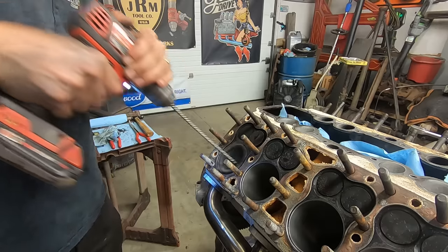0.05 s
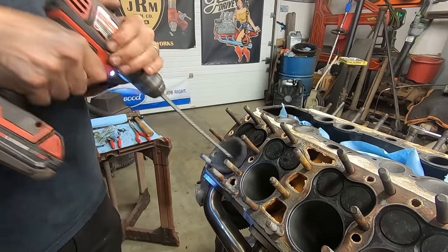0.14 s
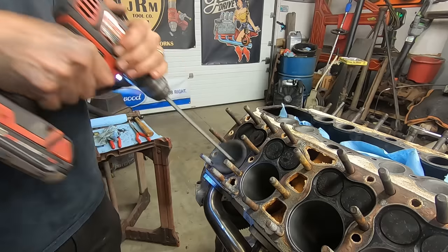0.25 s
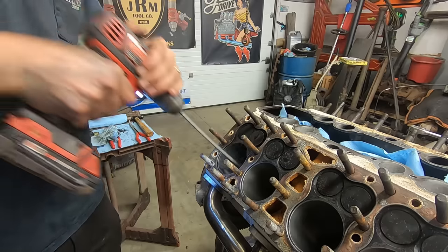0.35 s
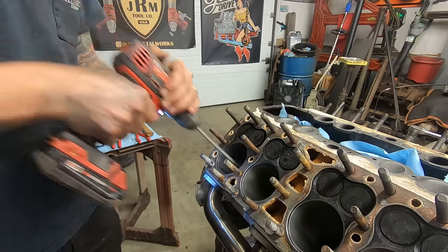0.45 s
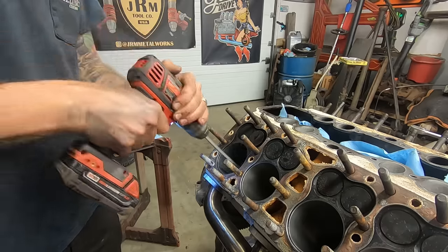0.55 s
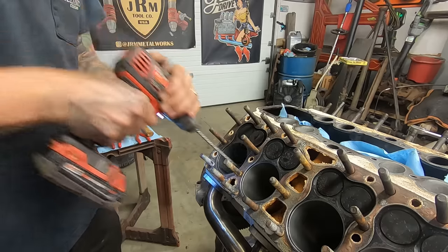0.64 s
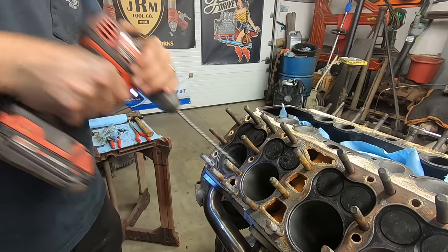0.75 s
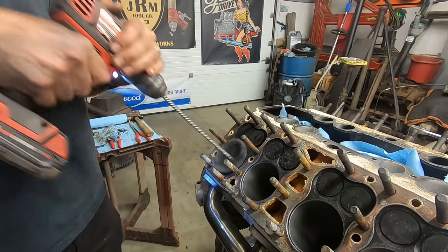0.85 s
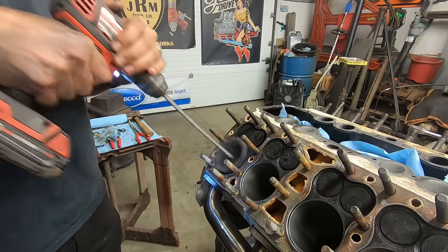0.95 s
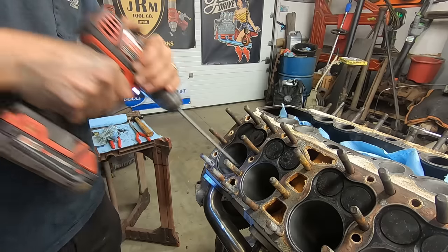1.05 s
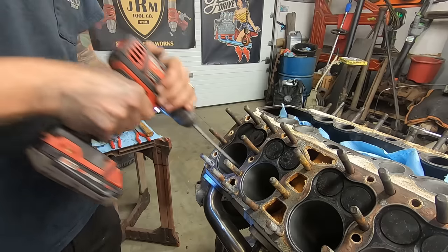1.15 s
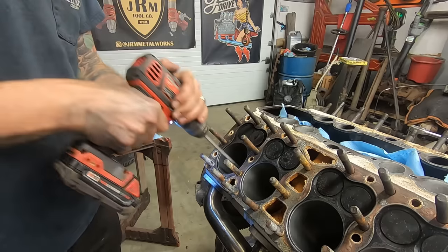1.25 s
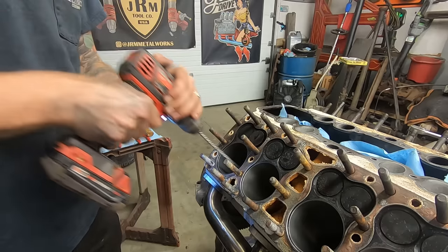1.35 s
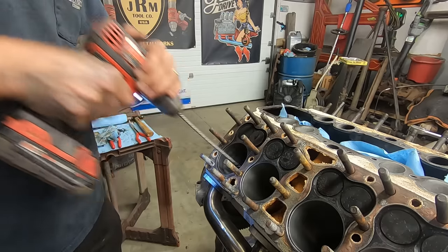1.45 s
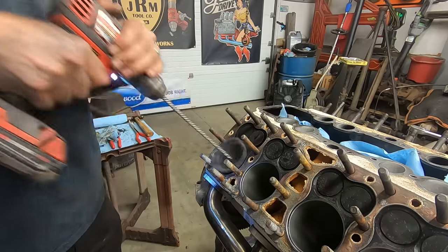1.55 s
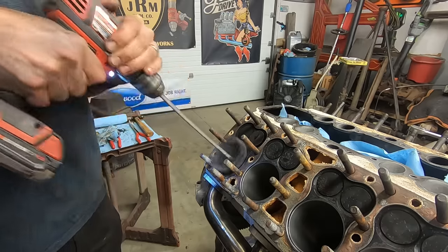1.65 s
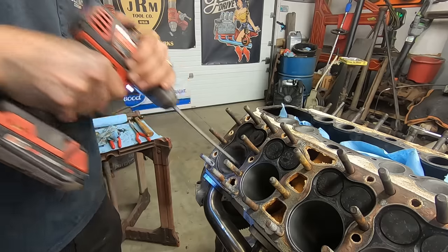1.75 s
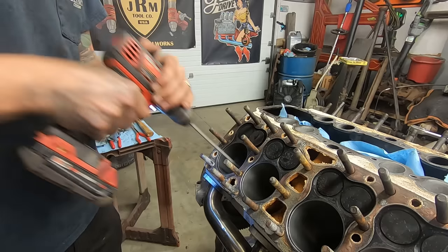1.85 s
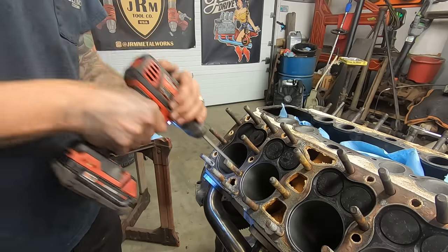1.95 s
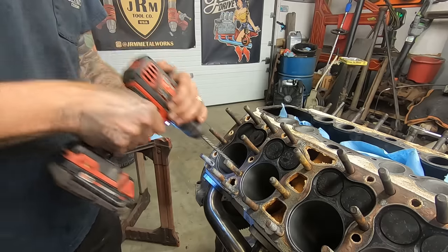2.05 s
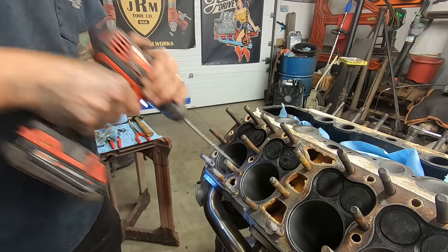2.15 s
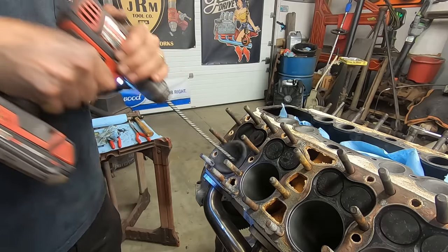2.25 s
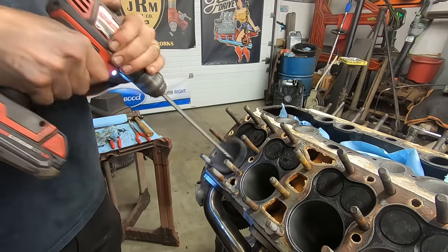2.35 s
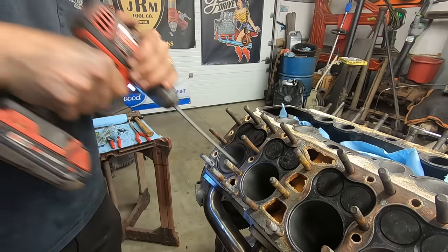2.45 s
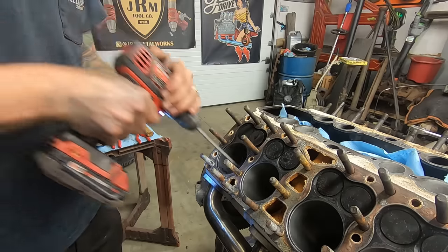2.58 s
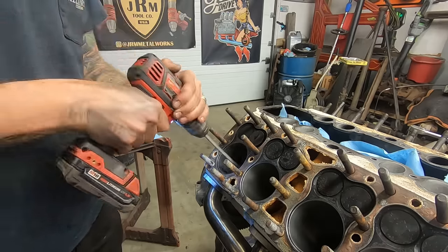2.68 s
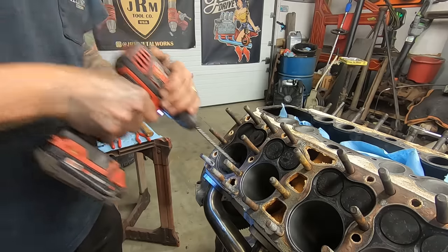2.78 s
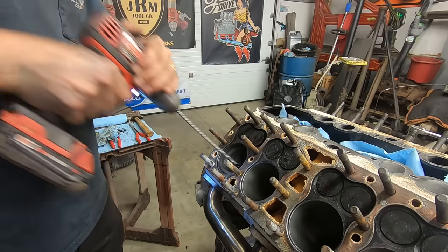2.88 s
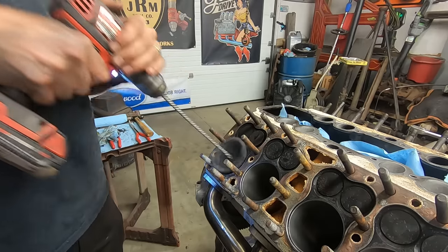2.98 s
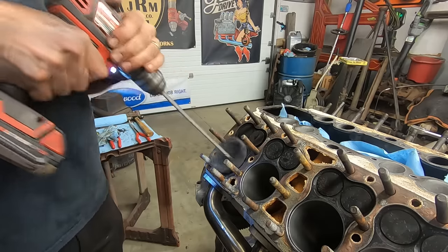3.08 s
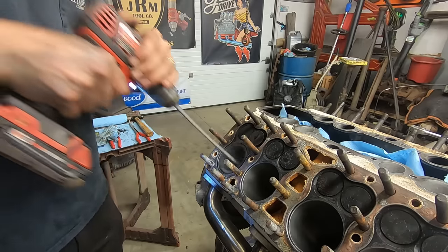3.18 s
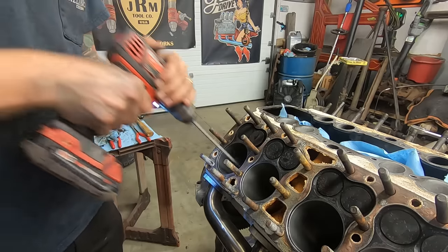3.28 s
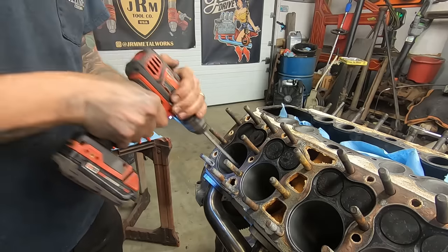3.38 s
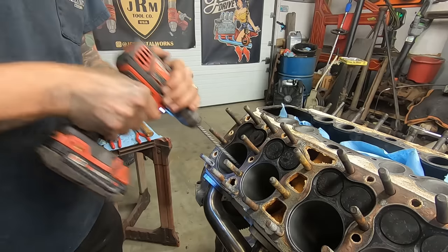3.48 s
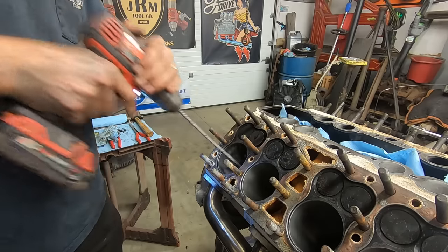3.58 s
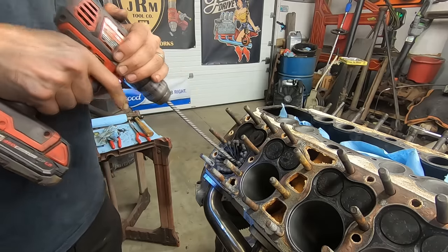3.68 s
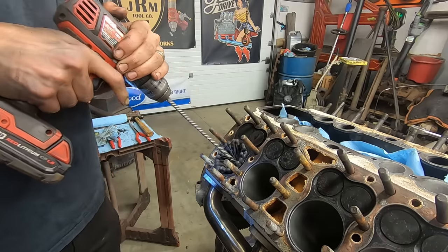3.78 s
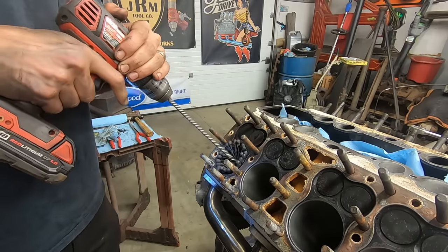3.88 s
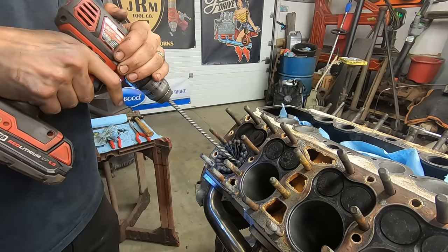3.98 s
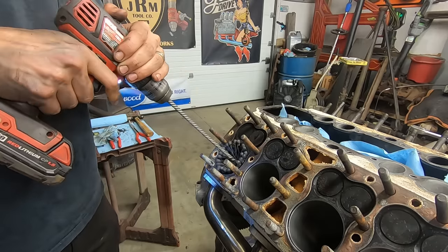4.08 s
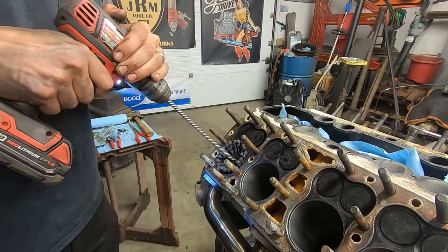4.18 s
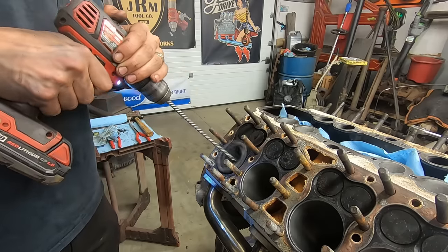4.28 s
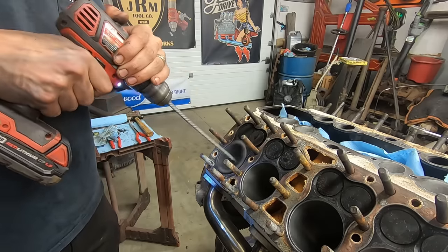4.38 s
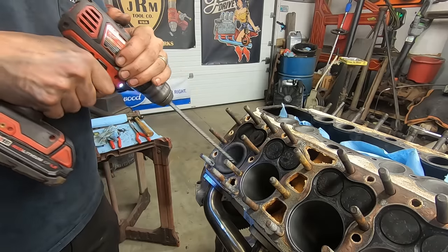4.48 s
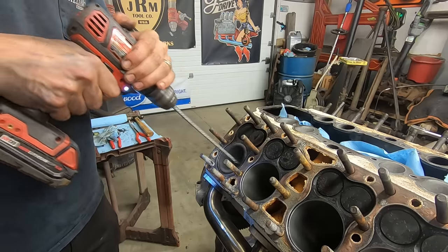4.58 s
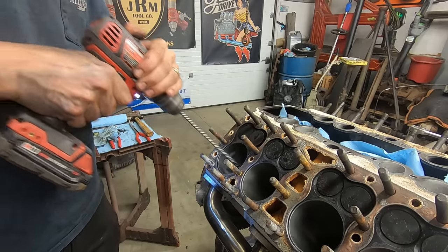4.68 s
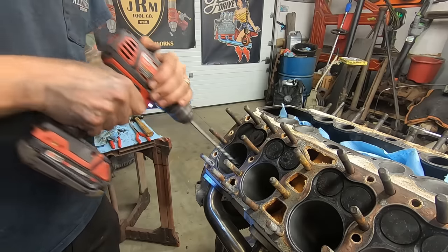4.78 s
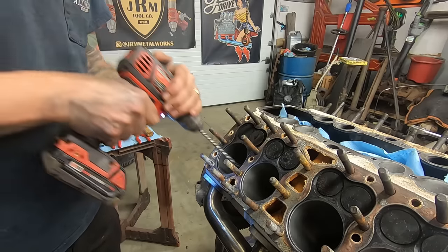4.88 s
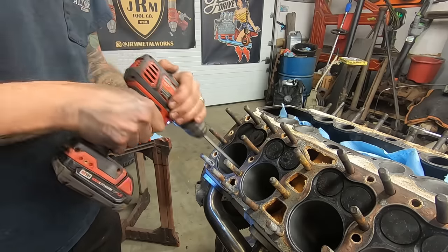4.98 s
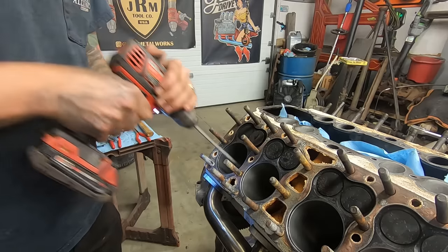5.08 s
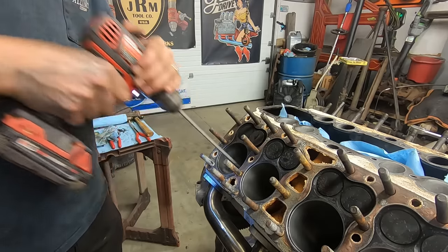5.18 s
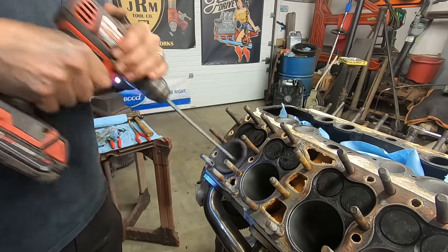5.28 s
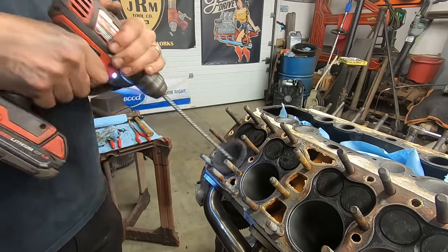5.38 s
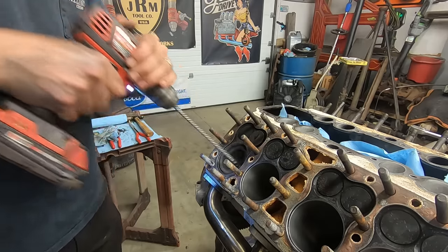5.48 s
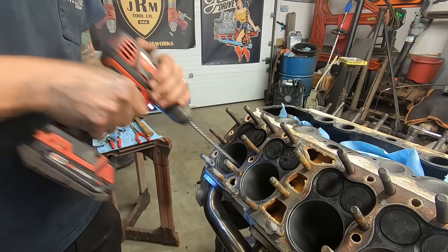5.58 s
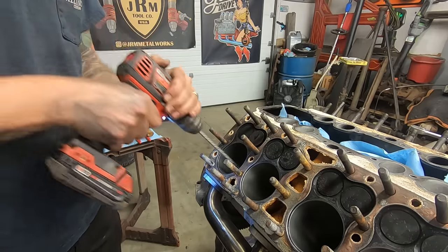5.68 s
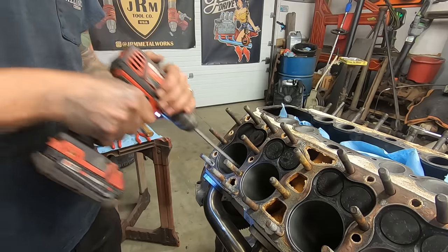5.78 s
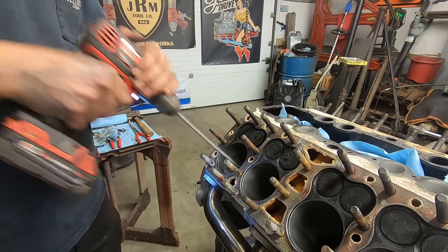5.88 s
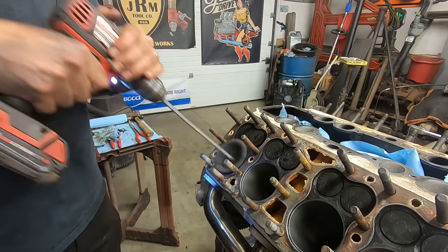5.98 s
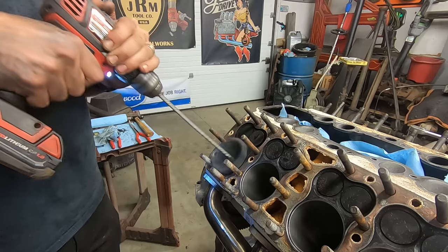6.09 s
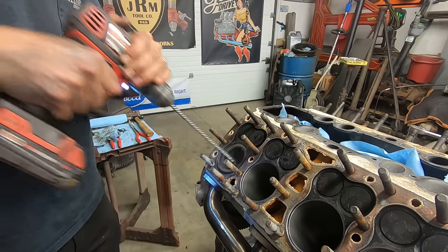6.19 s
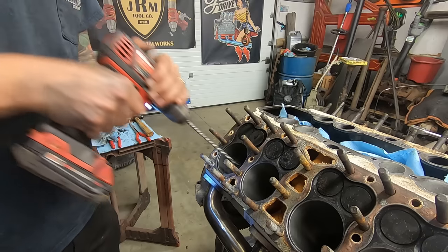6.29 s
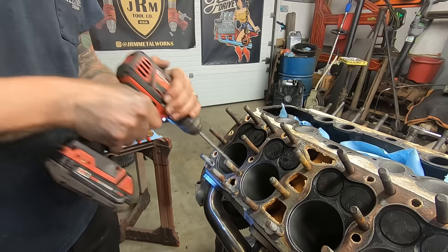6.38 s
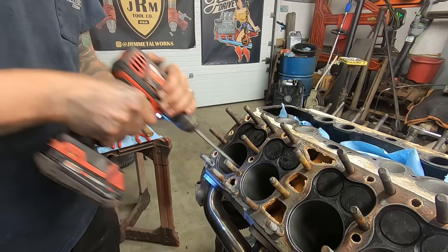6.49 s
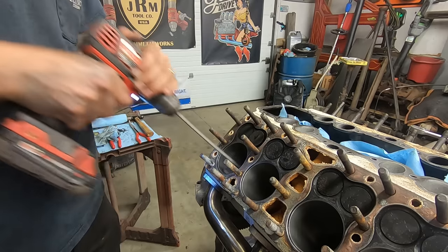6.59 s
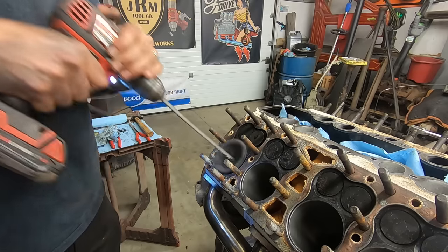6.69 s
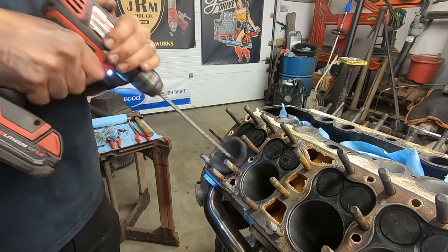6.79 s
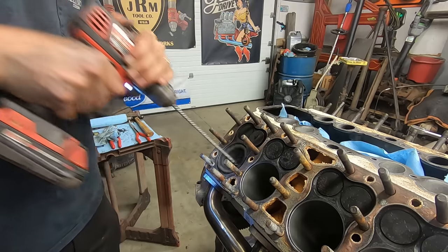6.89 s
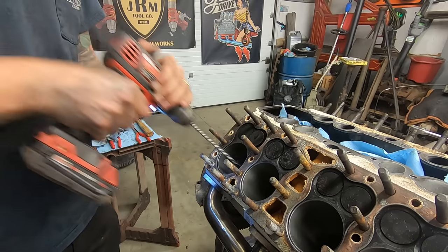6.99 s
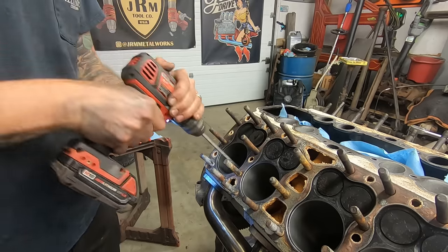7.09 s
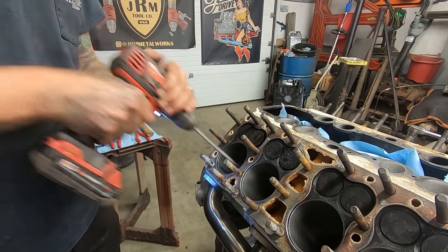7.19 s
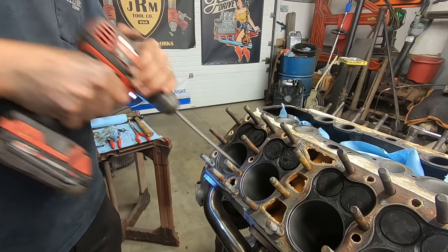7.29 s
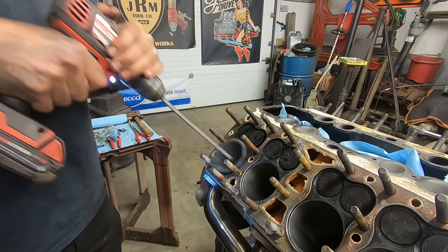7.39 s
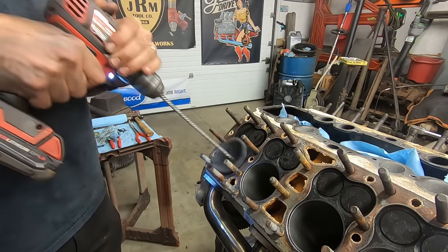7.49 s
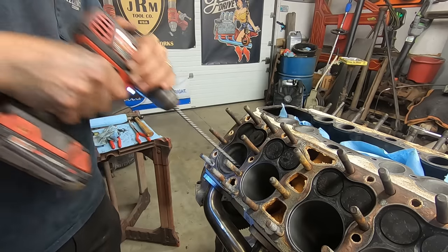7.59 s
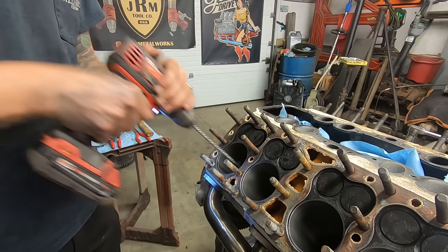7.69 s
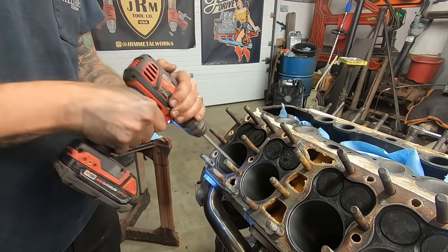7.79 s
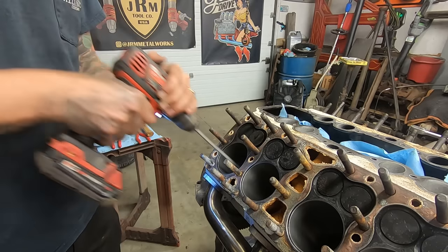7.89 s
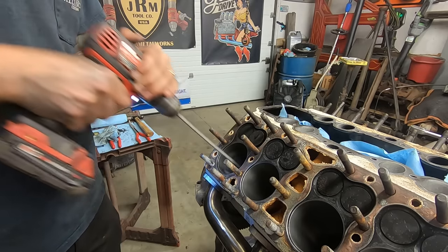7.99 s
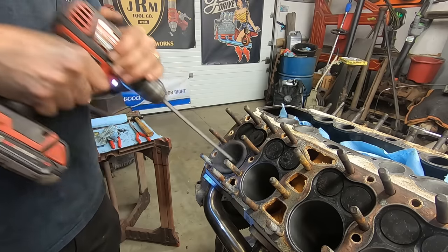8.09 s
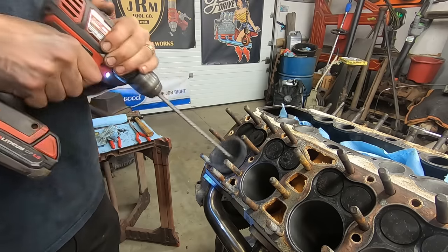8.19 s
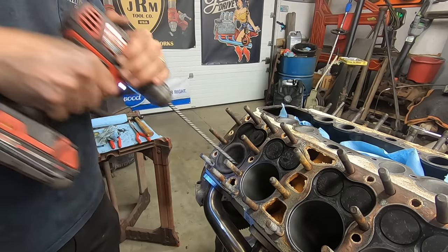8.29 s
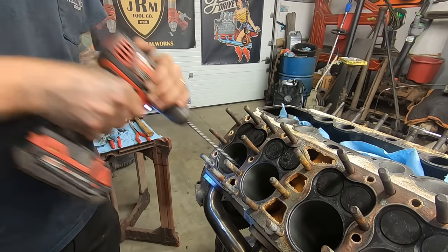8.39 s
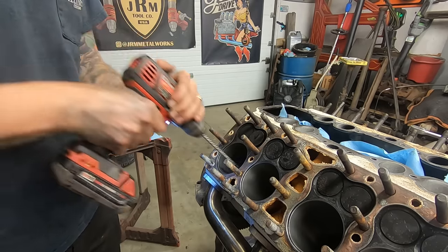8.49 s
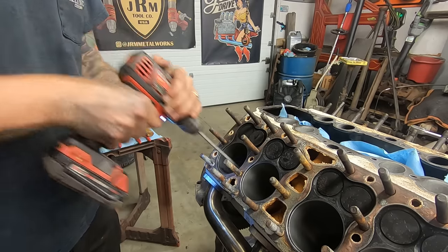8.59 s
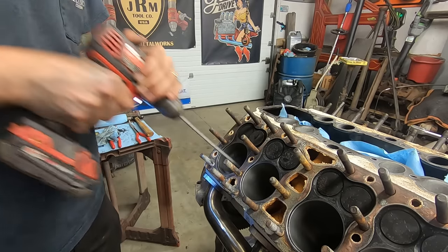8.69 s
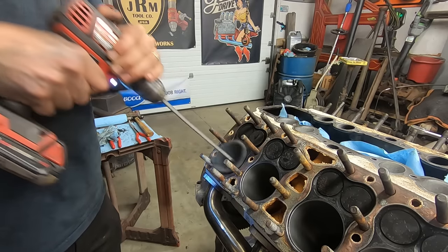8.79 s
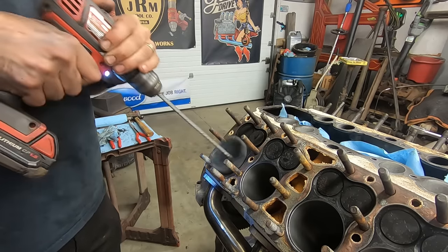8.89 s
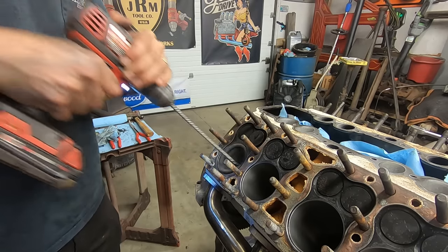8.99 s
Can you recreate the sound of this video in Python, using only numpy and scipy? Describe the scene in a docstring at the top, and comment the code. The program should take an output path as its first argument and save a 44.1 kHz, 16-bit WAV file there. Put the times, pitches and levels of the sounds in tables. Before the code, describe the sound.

Gritty, rhythmic scraping inside an iron engine cylinder under a steady geared drill whine, broken by a brief coast-down, switch clicks and a jolting restart.

```python
"""A cordless drill spins a ball hone up and down a cylinder of an iron engine block in a garage.
The gears whine and rattle as sine tones and dense tiny knocks; the balls scrape as coloured impacts and squeal.
The speed sags with every stroke; then the drill coasts to a stop and the balls ring their wire springs.
The trigger and the direction switch click, built from short knocks and rings.
It starts again the other way round: the gears strain, the hone jolts, and the strokes go on."""
import sys
import numpy as np
from scipy import signal
from scipy.fft import rfft, irfft
from scipy.io import wavfile

SR = 44100
rng = np.random.default_rng(int(sys.argv[2]) if len(sys.argv) > 2 else 0)


def materialize(psi):
    """Save the field psi as 16-bit PCM at rate SR to the path in sys.argv[1].

    A 1-D psi becomes a single channel; in a 2-D psi each row is a channel.
    """
    bounded = np.clip(np.atleast_2d(psi).T, -1, 1)
    quanta = np.round(bounded * 32767).astype(np.int16)
    wavfile.write(sys.argv[1], SR, quanta)


N = 399105
TIME, FREQ = np.arange(N) / SR, np.arange(N // 2 + 1) * SR / N  # seconds, Hz
RELEASE_S, REVERSE_S, RESTART_S = 3.63, 4.134, 4.36  # trigger let go, direction changed, motor on again
GEAR_RATIO = 8  # motor turns for one turn of the chuck and hone

# where each stroke turns round deep in the bore: (time [s], motor speed [turns/s], extra rubbing [dB])
BOTTOMS = [(0.0, 241.3, 6.5), (0.70, 240.7, 6), (1.413, 240.7, 6), (2.14, 239.1, 6.5), (2.86, 240.8, 6),
           (3.538, 240.6, 5), (5.14, 235.3, 6), (5.90, 234.5, 2.5), (6.6, 234.2, 2.5), (7.3, 234.4, 2),
           (7.98, 234.6, 3.5), (8.68, 234, 4)]
# where each stroke turns round at the mouth, and the stones catch the rim:
# (time [s], motor speed [turns/s], extra rubbing [dB])
MOUTHS = [(0.33, 247.2, 2), (1.081, 246.7, 2), (1.77, 244.4, 3.5), (2.472, 245.5, 1.5), (3.21, 245.5, 3.5),
          (4.55, 238.1, 3), (5.521, 239.4, 4.5), (6.249, 238.4, 4), (6.912, 239.2, 3.5), (7.59, 238.3, 3.5),
          (8.3, 239, 4), (9.01, 237.6, 4.5)]
# spectrum of the sharp grit: (frequency [Hz], relative level [dB])
GRIT = [(300, -60), (3000, -40), (6000, 5.5), (7400, 1.5), (8600, 2), (10400, -7), (11300, -16),
        (12400, -13), (14000, -20), (15500, -37)]


def undb(db):
    """Turn decibels into a gain."""
    return 10 ** (np.asarray(db) / 20)


def unit(x):
    """Scale a sound to an average (rms) level of 1."""
    return x / np.sqrt(np.mean(x ** 2))


def contour(points):
    """Join (Hz, value) points by lines on a log-frequency axis."""
    hz, value = np.transpose(points)
    return np.interp(np.log(FREQ + 1), np.log(hz), value)


def colour(x, points):
    """Shape a sound with a spectrum, then set its rms to 1."""
    return unit(irfft(rfft(x) * undb(contour(points)), N))


def walk(rate):
    """Smooth random curve of rms 1 that changes about rate times a second."""
    return unit(irfft(rfft(rng.standard_normal(N)) / (1 + (FREQ / rate) ** 4), N))


def bump(s, length):
    """A smooth swell that peaks at s and reaches length seconds to either side."""
    return np.maximum(1 - ((TIME - s) / length) ** 2, 0) ** 2


def pan(x, db):
    """Place a sound left (plus dB) or right (minus dB), keeping its mid level."""
    left = undb(db) / (1 + undb(db))
    return 2 * np.array([left * x, (1 - left) * x])


def impacts(per_second, spread_db):
    """Dense tiny blows of scattered size and either sign."""
    hit = rng.random(N) < per_second / SR
    size = undb(spread_db * rng.standard_normal(N))
    return unit(hit * rng.choice([-1, 1], N) * size)


def scattered(per_second, spread_db, share):
    """Impacts in two channels; a share of their power reaches the two ports by unrelated paths."""
    common, left, right = (impacts(per_second, spread_db) for _ in range(3))
    return np.sqrt(1 - share) * common + np.sqrt(share) * np.array([left, right])


def ports(x, lag_s=.000028):
    """The hone lies to the right, louder there in the treble; a slight lag separates the two ports."""
    # place of the hone between the ears: (frequency [Hz], left minus right [dB])
    hone_side = [(2000, 0.5), (4500, -3), (8500, -3.5), (12000, -8.5), (15000, -6)]
    left, right = rfft(x)
    side_db = contour(hone_side)
    late = np.exp(-2j * np.pi * FREQ * lag_s)
    return irfft([left * undb(side_db / 2), right * undb(-side_db / 2) * late], N)


def centre_bass(x):
    """Draw low notes towards the middle, since long waves reach both ports alike."""
    # how much of the sideways place is heard: (frequency [Hz], share)
    width = [(230, .25), (520, 1.36), (1500, 1.18)]
    mid = x.mean(axis=0)
    side = irfft(rfft(x[0] - x[1]) / 2 * contour(width), N)
    return np.array([mid + side, mid - side])


def garage_hum():
    """Faint noise with the garage's spectrum, nearly all of it unrelated in the two channels."""
    # spectrum of the background: (frequency [Hz], relative level [dB])
    background = [(25, -10), (48, -8), (60, 3), (76, -8), (100, -9), (150, 9), (184, 14.5), (260, -4),
                  (500, -5), (720, 5), (950, 0), (2000, -5), (8000, -22), (15000, -56)]
    middle = undb(-79.0) * colour(rng.standard_normal(N), background)
    wide = undb(-61) * colour(rng.standard_normal((2, N)), background)
    return middle + wide


def echoes(t60=0.42, treble_t60=0.25, near_db=-2, near_t60=0.05):
    """Quick reflections off the block and the worker, then the room's tail, shorter in the treble."""
    t, out = TIME[:SR * 3 // 4], []
    low_pass = signal.butter(1, 5000, fs=SR, output="sos")
    apart = signal.butter(1, 600, "highpass", fs=SR, output="sos")  # long waves reach both ports alike
    shared = rng.standard_normal((2, len(t)))
    for _ in range(2):
        own = rng.standard_normal((2, len(t)))
        noise, near = shared + signal.sosfilt(apart, own - shared)
        low = signal.sosfilt(low_pass, noise)
        tail = low * 1000 ** (-t / t60) + (noise - low) * 1000 ** (-t / treble_t60)
        tail = tail * (t > .008)
        near = near * 1000 ** (-t / near_t60) * (t > .001)
        out.append(tail / np.linalg.norm(tail) + undb(near_db) * near / np.linalg.norm(near))
    return np.array(out)


def garage(x, height, wet_db):
    """The pattern of reflections shifts as the tool passes bottom, middle and mouth."""
    wet, mono = 0, x.mean(axis=0, keepdims=True)
    for place in (-1, 0, 1):
        nearness = np.cos(np.pi / 2 * np.minimum(np.abs(height - place), 1))
        wet = wet + signal.fftconvolve(nearness * mono, echoes(), axes=1)[:, :N]
    return x + undb(wet_db) * wet


def swing(deep, mouth, deep_lag_s=0, mouth_lag_s=0):
    """A value that moves to and fro between the two ends of every stroke."""
    s = np.column_stack([np.array(BOTTOMS)[:, 0] + deep_lag_s, np.array(MOUTHS)[:, 0] + mouth_lag_s])
    values = np.column_stack([deep * np.ones(len(s)), mouth * np.ones(len(s))])
    return np.interp(TIME, s.ravel(), values.ravel())


def motor():
    """Turns per second, the share of full speed, and the load on the gears."""
    slowest_lag_s, fastest_lag_s = 0.1114, 0.0405  # slowest just after the bottom, fastest after the mouth
    coast_s, coast_shape = .2, 1.65  # how the speed dies away once the trigger is let go
    spin_up_s, spin_up_shape = .061, 1.05  # and how it comes back
    unload_s = 0.086  # the gears lose their load this fast
    deep_hz, mouth_hz = np.array(BOTTOMS)[:, 1], np.array(MOUTHS)[:, 1]
    released, restarted = np.maximum(TIME - RELEASE_S, 0), np.maximum(TIME - RESTART_S, 0)
    coasting = np.exp(-(released / coast_s) ** coast_shape)
    rising = 1 - np.exp(-(restarted / spin_up_s) ** spin_up_shape)
    running = np.where(TIME > RESTART_S, rising, coasting)
    torque = np.where(TIME > RESTART_S, 1, np.exp(-released / unload_s))
    return running * swing(deep_hz, mouth_hz, slowest_lag_s, fastest_lag_s), running, torque


def clicks(snap_t60=0.017, crack_t60=0.012, crack_db=-7, ring_db=-7):
    """Each blow is a dry knock that cracks, rings the shell briefly and adds a bright snap."""
    # trigger, direction switch and gears taking up their play:
    # (time [s], dry peak [dB], bright snap against knock [dB], left minus right [dB])
    blows = [(4.054, -28, 18, 2), (4.061, -26, 20, -6), (4.135, -27, -8, 3), (4.136, -10.5, -30, 7),
             (4.1378, -17.5, -3, 3), (4.143, -23.5, 3, -8), (4.1442, -29, -5, 0), (4.298, -31, -27, 6),
             (4.311, -41, -6, 3), (4.335, -42, -20, 3), (4.359, -24.5, -1, 6), (4.364, -30, -4, 3),
             (4.392, -12.5, -28, 7), (4.395, -8, -20, 5), (4.418, -8.5, -37, 4), (4.421, -7, -25, 4)]
    # ringing of the plastic shell: (frequency [Hz], relative level [dB], time to fall by 60 dB [s])
    shell = [(420, -18, 0.015), (1060, 1, 0.011), (1350, 5, 0.015), (1640, 13, 0.012), (2460, 7, 0.015),
             (2850, -3, .018), (3500, 3, 0.016), (4120, -1, .014), (4750, 5, 0.026), (5500, 2, .014),
             (6450, -3, .016)]
    out, t = np.zeros((2, N)), TIME[:SR // 8]
    treble = signal.butter(2, [4100, 7200], "bandpass", fs=SR, output="sos")
    body = np.vstack([signal.butter(2, [800, 3900], "bandpass", fs=SR, output="sos"),
                      signal.butter(4, 6400, fs=SR, output="sos")])
    small = signal.butter(2, 300, "highpass", fs=SR, output="sos")  # the blows carry no deep bass
    knock = signal.sosfilt(body, 1.0 * (t == 0))
    for s, db, bright_db, side_db in blows:
        ring = sum(rng.choice([-1, 1]) * undb(d - 60 * t / t60) * np.sin(2 * np.pi * f * t)
                   for f, d, t60 in shell)
        crack = signal.sosfilt(body, rng.standard_normal(len(t))) * 1000 ** (-t / crack_t60)
        snap = signal.sosfilt(treble, rng.standard_normal(len(t))) * 1000 ** (-t / snap_t60)
        blow = unit(knock) + undb(ring_db) * unit(ring)
        blow = blow + undb(crack_db) * unit(crack) + undb(bright_db) * unit(snap)
        blow = signal.sosfilt(small, blow)
        start = int(s * SR)
        out[:, start:start + len(t)] += pan(blow / np.abs(blow).max() * undb(db), side_db)
    return out


def jolts(low_hz=300, high_hz=720, t60=0.05):
    """Dull thuds of the hone against the bore as it starts to turn: fading low noise."""
    # the thuds: (time [s], level of the noise at the start [dB])
    thuds = [(4.395, -44), (4.418, -31)]
    push = sum(undb(db) * (TIME > s) * 1000 ** (-np.maximum(TIME - s, 0) / t60) for s, db in thuds)
    body = signal.butter(3, [low_hz, high_hz], "bandpass", fs=SR, output="sos")
    noise = rng.standard_normal(N)
    return pan(signal.sosfilt(body, push * noise) / signal.sosfilt(body, noise).std(), 0)


def run_down(db=-38, peak_s=3.73, rise_s=0.046, fall_db_per_s=52, top_hz=8500):
    """As the hone slows, single balls knock on the bore and ring their wire springs."""
    # ringing of the springs: (frequency [Hz], width [Hz], relative level [dB])
    springs = [(1350, 70, -5), (2720, 100, -15), (3650, 100, 0), (4320, 130, 5), (5220, 120, -9),
               (5860, 160, 4)]
    ring = sum(undb(d) * FREQ * width / (FREQ * width + 1j * (FREQ ** 2 - hz ** 2))
               for hz, width, d in springs)
    ring = ring / (1 + (FREQ / top_hz) ** 6)  # the knocks carry little treble above top_hz
    blows = scattered(per_second=600, spread_db=0, share=0.34)
    knocks = unit(irfft(rfft(blows) * ring, N))
    rise = np.clip(1 + (TIME - peak_s) / rise_s, 0, 1)
    return knocks * rise * undb(db - fall_db_per_s * np.maximum(TIME - peak_s, 0))


def squeals(low_rough=0.2, high_rough=0.97, sag_hz_per_s=1200, rasp_db=-10, rasp_lag_s=0.063, rasp_s=0.03):
    """Short stick-slip tones that sag in pitch, the high ones hoarse; the balls then rasp over the rim."""
    # squeals of the stones at the mouth: (time [s], frequency [Hz], level [dB], half-length [s])
    rim_tones = [(1.011, 8800, -33, 0.029), (1.088, 8760, -31, .03), (1.76, 8800, -26, 0.015),
                 (2.433, 8810, -40, 0.031), (3.183, 8800, -23, 0.015), (3.246, 8840, -35, 0.031),
                 (6.155, 2710, -21, 0.02), (6.189, 2660, -25, 0.023), (6.221, 2700, -24, 0.019),
                 (6.86, 2710, -20, 0.024), (6.925, 2680, -25.5, .022), (7.565, 2705, -26, 0.022),
                 (7.624, 2680, -23.5, 0.02), (8.32, 2730, -18.5, 0.016), (8.374, 2650, -23, 0.02),
                 (8.962, 2690, -22, 0.018), (9.022, 2680, -23, 0.024)]
    tone, rasp, slip = 0, 0, walk(130)
    for s, hz, db, length in rim_tones:
        rough = np.interp(hz, [2700, 8800], [low_rough, high_rough])  # phase jitter in radians
        cycles = (hz - sag_hz_per_s * (TIME - s) / 2) * (TIME - s)
        wave = np.sqrt(2) * np.sin(2 * np.pi * cycles + rough * slip)
        tone = tone + undb(db) * bump(s, length) * wave
        rasp = rasp + undb(db + rasp_db) * bump(s + rasp_lag_s, rasp_s)
    return pan(tone, 0), rasp * colour(scattered(per_second=8300, spread_db=2, share=.5), GRIT)


def rubbing(running):
    """Rubbing level, and grit against it, in dB: they follow speed and swell where strokes turn round."""
    forward_db, back_db, grit_db = -20.5, -21, -8.5  # in mid-stroke; grit relative to rubbing
    grit_slow_db = -8  # a slow hone sheds less grit
    deep_press_s, mouth_press_s = 0.16, 0.13  # half-lengths of the harder rubbing at each end of a stroke
    scrape_share = 0.27  # the part of that swell that the scrape follows
    coast_power, start_power = 1.9, 1.16  # rubbing as a power of speed
    settle_db, settle_db_per_s = -41, 21  # the balls rustle on their springs as the hone comes to rest
    bite_db, bite_lag_s, bite_s = 4.5, 0.094, 0.081  # the stones bite harder as they start to turn
    press_db = (sum(db * bump(s, deep_press_s) for s, _, db in BOTTOMS)
                + sum(db * bump(s, mouth_press_s) for s, _, db in MOUTHS))
    turning = np.where(TIME < RESTART_S, undb(forward_db) * running ** coast_power,
                       undb(back_db) * running ** start_power)
    settling = undb(settle_db - settle_db_per_s * np.maximum(TIME - RELEASE_S, 0))
    rub_db = 20 * np.log10(np.hypot(turning, settling)) + bite_db * bump(RESTART_S + bite_lag_s, bite_s)
    grit_level_db = grit_db + grit_slow_db * (1 - running) + (1 - scrape_share) * press_db
    return rub_db + scrape_share * press_db, grit_level_db


def hone(turns, rub_db, grit_db, sweep=0.026, grab_db=.5, scrape_db=-2.0):
    """Abrasive balls scrape the iron and shed sharp grit; the pressure varies around the bore."""
    # spectrum of the scraped bore: (frequency [Hz], relative level [dB])
    bore_tint = [(100, -61), (400, -23.5), (1800, -17.5), (2700, -3.5), (3400, -3.5), (3950, -4), (4600, 0),
                 (5500, 0), (6150, 1.5), (6700, -12.5), (7600, -14), (11000, -20.5), (15500, -66)]
    pressure = (1 + sweep * np.sin(2 * np.pi * turns / GEAR_RATIO)) * undb(grab_db * walk(42))
    scrape = undb(scrape_db) * colour(scattered(per_second=6000, spread_db=1.0, share=0.064), bore_tint)
    grit = undb(grit_db) * colour(scattered(per_second=5000, spread_db=1.5, share=0.96), GRIT)
    return undb(rub_db) * pressure * (scrape + grit)


def rattle(turns, beat=0.12):
    """Gear teeth knock into the housing, harder once every motor turn; each tooth flank has its own colour."""
    # spectrum of the housing: (frequency [Hz], relative level [dB])
    housing = [(90, -52), (165, -19), (310, -18), (480, -11), (720, -2.5), (1060, -5), (1180, 0.5),
               (1440, 0), (1620, -3), (1800, -1.5), (2050, 2.5), (2800, 0.5), (4000, -2.5), (7000, -16.5),
               (15000, -58)]
    # tint of the rattle turning forward, and the opposite turning back: (frequency [Hz], change [dB])
    flank_tint = [(300, .5), (700, -0.93), (1400, -0.44), (1950, 1), (2700, 0)]
    blows = impacts(per_second=7000, spread_db=2.0) * (1 + beat * np.sin(2 * np.pi * turns))
    knocks = rfft(colour(blows, housing))
    flank = undb(contour(flank_tint))
    return np.where(TIME < REVERSE_S, irfft(knocks * flank, N), irfft(knocks / flank, N))


def rattle_level(hz, running, torque, height):
    """Coasting gears rattle softly; they take up the load again as they spin up."""
    forward_db, back_db = -28.5, -28
    coast_db = -16  # relative to the loaded gears
    deep_db = 0.36  # the gears rattle more deep in the bore, less at its mouth
    loaded = np.where(TIME > RESTART_S, undb(back_db) * np.minimum(hz / 150, 1) ** 2,
                      undb(forward_db) * np.maximum(torque, undb(coast_db) * running))
    return loaded * undb(-deep_db * height)


def spin_up(turns, rough=0.56, flutter_db=3):
    """While the motor accelerates, the loaded gear stages sing out hoarsely."""
    # the straining gear stages: (time [s], half-length [s], multiple of motor speed, peak of the sine [dB])
    strain = [(4.52, .06, 2.875, -39), (4.5, 0.12, 10, -33), (4.525, 0.088, 11.25, -27),
              (4.505, 0.059, 15, -24), (4.56, 0.054, 20, -27), (4.54, .08, 30, -33)]
    out = 0
    for s, length, multiple, db in strain:
        level = undb(db + flutter_db * walk(50)) * bump(s, length)
        out = out + level * np.sin(2 * np.pi * multiple * turns + rough * walk(90))
    return out


def whine(turns, running, height, flutter_db=2.5, twist=0.016, smear=0.36, low_stroke_db=1.5,
          back_share=0.51, emerge_power=6, loose_smear=0.66, mesh_steadiness=0.27):
    """Tooth-mesh tones at multiples of the motor speed; the play in the gears smears them."""
    # the tones: {multiple of motor speed: (relative level forward [dB], relative level back [dB])}
    mesh_tones = {1: (-58.5, -56), 2: (-53, -55.5), 2.875: (-72, -46), 3: (-41, -48), 4: (-66, -45),
                  6: (-53, -51), 10: (-30, -31), 10.5: (-43, -45), 11: (-42.5, -43.5),
                  11.25: (-40.5, -33.5), 11.5: (-36, -42), 12: (-49, -41.5), 13.5: (-55, -41.5),
                  14.25: (-46, -43), 14.625: (-60, -40.5), 15: (-37.5, -36), 19: (-55, -47),
                  20: (-45, -29.5), 21: (-41, -58), 22.5: (-36, -46), 25: (-43, -44), 30: (-46, -44),
                  33.75: (-48, -51), 35: (-47, -56), 36: (-49, -58), 40: (-48.5, -63), 45: (-67, -54),
                  50: (-68, -64)}
    # tones that change with the stroke: positive ones are louder near the mouth, negative ones near the bottom:
    # {multiple: (change turning forward [dB], lag [s])}
    stroke_changes = {3: (5, -0.0028), 10: (1.05, -0.041), 15: (2.2, -0.12), 20: (-1.4, -0.089)}
    # the two leading tones surge and sink: (time [s], half-length [s], multiple, change [dB])
    surges = [(0.68, .11, 10, 2.5), (0.83, .06, 10, -5), (1.262, 0.062, 10, -7), (1.65, .1, 10, 2.5),
              (2.358, 0.072, 10, 3.5), (2.54, .1, 10, 4.5), (2.672, .07, 10, -5), (3.064, 0.093, 10, 3),
              (3.32, 0.067, 10, 3.5), (3.552, 0.062, 10, 2), (4.74, .17, 10, -6), (4.886, 0.079, 20, 5),
              (5.0, 0.055, 20, -6), (5.3, 0.13, 20, -5), (6.22, .17, 20, -4), (7.12, 0.2, 20, 2),
              (7.95, .07, 20, 3), (8.17, .06, 20, -3), (8.95, 0.19, 20, -7)]
    angle = 2 * np.pi * turns + twist * walk(22)  # the whole gear train twists a little
    flutters = [walk(22) for _ in range(2)]
    forward, out = TIME < REVERSE_S, 0
    for multiple, (forward_db, back_db) in mesh_tones.items():
        shake, slip = (np.roll(f, rng.integers(N)) for f in flutters)
        shake = np.minimum(shake, 1)  # teeth can lose contact, but cannot mesh more than fully
        stroke_db, lag = stroke_changes.get(multiple, (low_stroke_db * (multiple < 10), 0))
        # the low tones change less with the stroke turning back
        share = np.where(forward, 1, back_share) if multiple <= 10 else 1
        db = np.where(forward, forward_db, back_db) + flutter_db * shake
        db = db + stroke_db * share * np.interp(TIME - lag, TIME, height)
        if multiple == 10:  # this main mesh tone flutters less
            db = db - mesh_steadiness * flutter_db * shake
        db = db + sum(change * bump(s, length) for s, length, which, change in surges if which == multiple)
        # the later gear stages, at uneven multiples, have more play
        blur = smear * min(multiple / 10, 2) + loose_smear * (multiple % 1 > 0)
        # the high tones need nearly full speed
        emerged = running ** (emerge_power * np.clip(multiple / 10, 1, 2))
        out = out + undb(db) * emerged * np.sin(multiple * angle + blur * slip)
    return out


def scene():
    """Drill, hone and clicks in the garage, over its faint hum."""
    hz, running, torque = motor()
    turns = np.cumsum(hz) / SR
    height = swing(-1, 1, deep_lag_s=0.046)  # -1 deep in the bore, +1 at its mouth
    # the drill leans left as it is lifted towards the listener, most a little before the rim;
    # tones and gears each take their own multiple of this lean
    lean = swing(2.5, 7.5, mouth_lag_s=-0.093)
    tones = pan(whine(turns, running, height) * torque * undb(3) + spin_up(turns), 0.53 * lean)
    gears = pan(rattle(turns) * rattle_level(hz, running, torque, height), 1.3 * lean)
    squeal, rasp = squeals()
    bore = ports(hone(turns, *rubbing(running)) + rasp + run_down())
    singing = garage(tones + squeal, height, wet_db=-16)
    knocking = garage(gears + clicks() + jolts(), height, wet_db=-7)
    return centre_bass(singing + knocking) + garage(bore, height, wet_db=-11.0) + garage_hum()


def record(dry):
    """A steep low-pass filter cuts the treble above 15.6 kHz."""
    return signal.sosfilt(signal.ellip(8, .2, 70, 15600, fs=SR, output="sos"), dry)


dry = scene()
out = record(dry)
materialize(out)
```